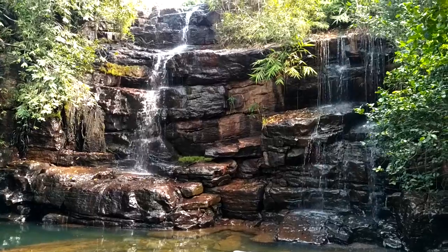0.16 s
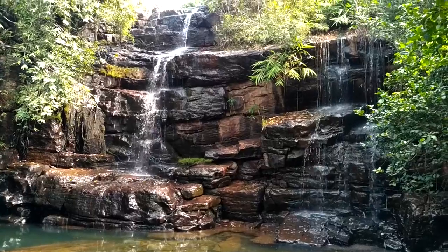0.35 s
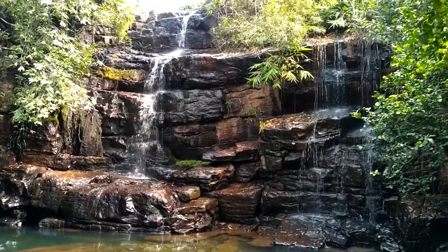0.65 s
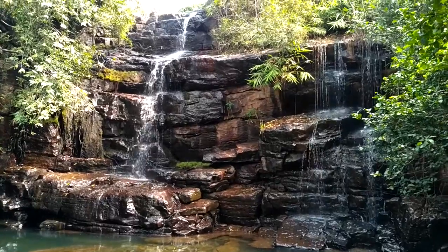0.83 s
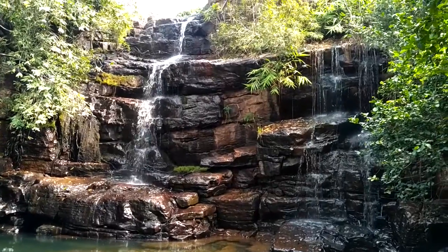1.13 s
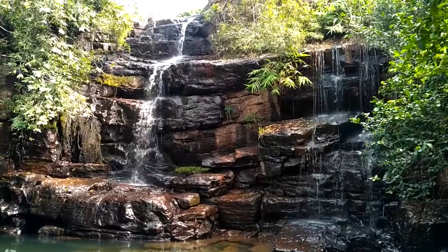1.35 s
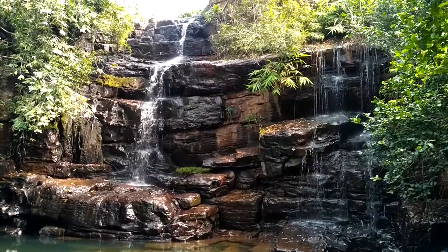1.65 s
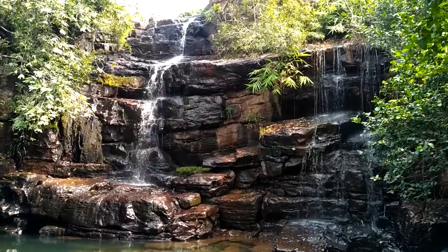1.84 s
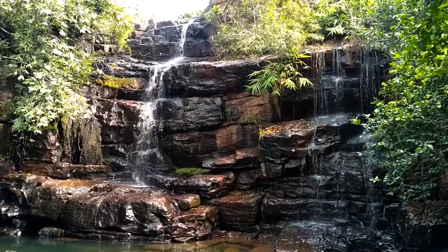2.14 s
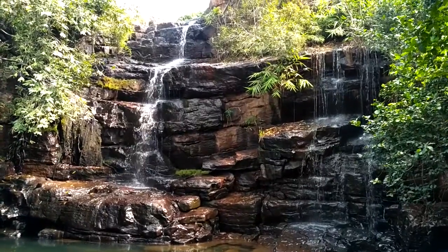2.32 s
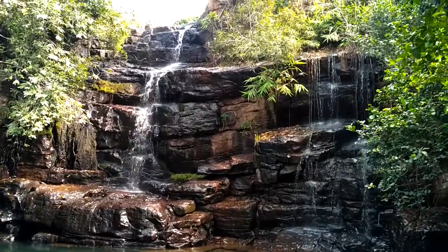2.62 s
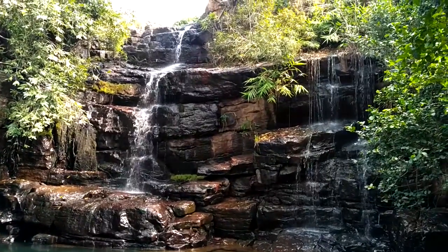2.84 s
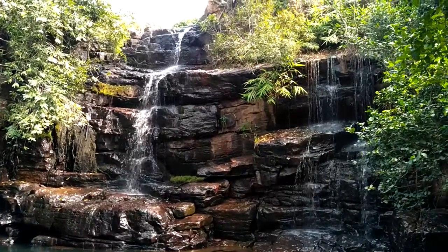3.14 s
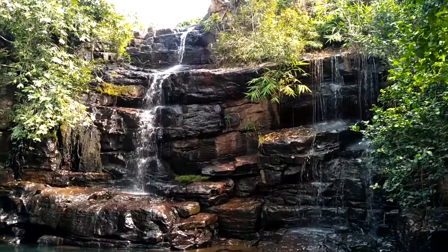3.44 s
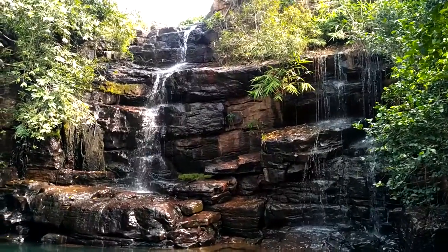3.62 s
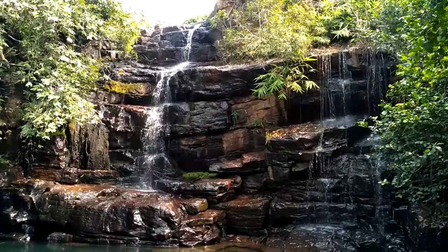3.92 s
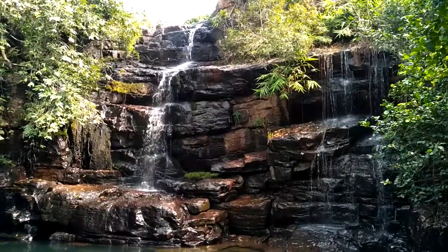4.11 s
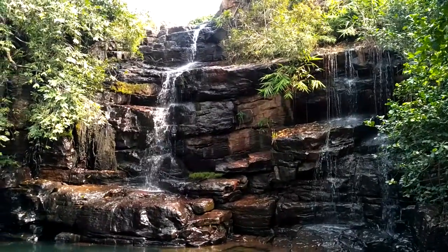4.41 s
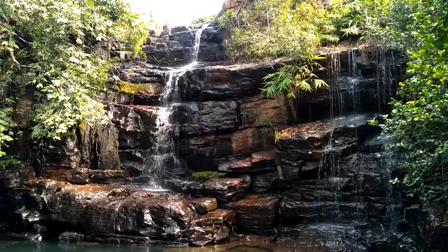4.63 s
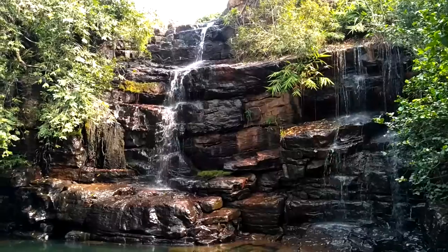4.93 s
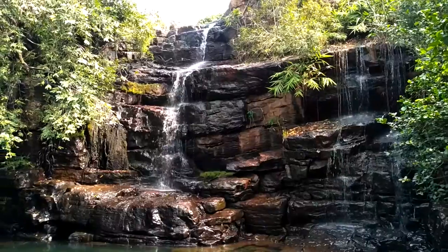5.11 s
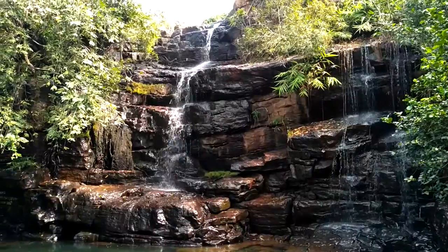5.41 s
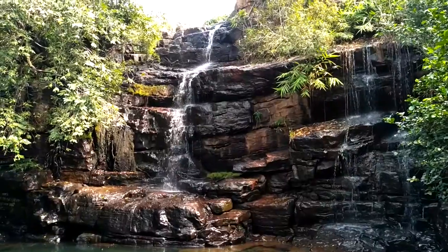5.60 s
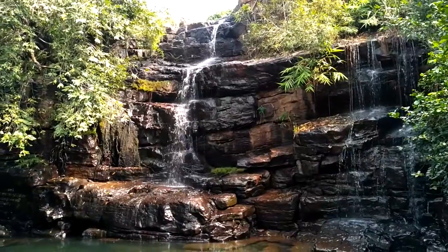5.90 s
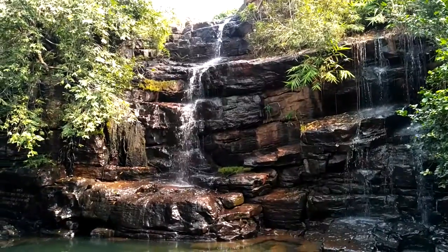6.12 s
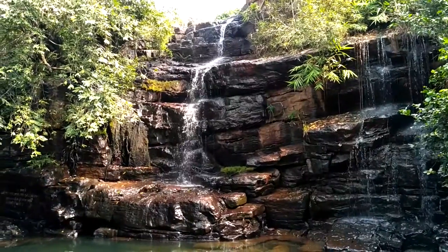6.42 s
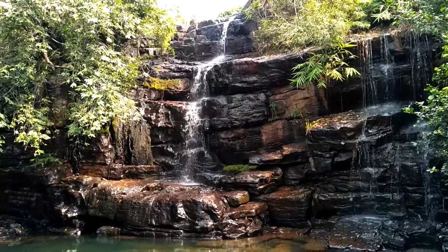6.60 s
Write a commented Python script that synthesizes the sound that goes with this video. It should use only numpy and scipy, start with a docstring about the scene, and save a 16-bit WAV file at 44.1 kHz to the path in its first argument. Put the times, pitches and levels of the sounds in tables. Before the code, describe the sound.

Heard from the bank, the same in both ears, a small waterfall hisses and patters over stone into a gurgling pool. Almost as soon as it has faded in, it drops to a much quieter level and stays there for nearly four seconds. Then it jumps back to full strength and runs on, with small splashes, bubbly plops and a few soft bumps in the pool.

```python
"""A thin waterfall splashes down rock ledges into a pool, heard from the bank, the same in both ears.
It fades in: spray hisses, drops patter on stone and the pool churns. Just after half a second the whole
sound sinks far down, while clumps of water slap the ledges, trapped air plops and the pool thuds softly.
At about 4.4 seconds it comes back at once. From there to the end, the sizzle of thin trickles turns
a little duller."""
import sys
import numpy as np
from scipy import signal
from scipy.fft import rfft, irfft, next_fast_len
from scipy.io import wavfile
from scipy.ndimage import map_coordinates

SR = 44100
rng = np.random.default_rng(int(sys.argv[2]) if len(sys.argv) > 2 else 0)


def generate_wav(sig):
    """Save sig (samples, or channels by samples) to the path in sys.argv[1] as 16-bit PCM at SR."""
    pcm = np.round(np.clip(np.atleast_2d(sig).T, -1, 1) * 32767).astype(np.int16)
    wavfile.write(sys.argv[1], SR, pcm)


N = 297675  # 6.75 seconds


def amp(db):
    """Turn decibels (dB) into a number to multiply a sound by."""
    return 10 ** (np.asarray(db) / 20)


def unit(x):
    """Scale a sound so that its average strength (rms) is 1."""
    return x / np.sqrt(np.mean(x ** 2) + 1e-20)


def ramp(start_s, length_s):
    """A straight rise from 0 to 1."""
    return np.clip((np.arange(N) / SR - start_s) / length_s, 0, 1)


def strike(t, attack, t60):
    """A quick rise, then a fade. Here and below, t60 is the seconds it takes to fade by 60 dB."""
    return (1 - np.exp(-t / attack)) * amp(-60 * t / t60)


def wobble(rate):
    """A smooth curve through random points, rate of them a second."""
    return map_coordinates(rng.standard_normal(int(N * rate / SR) + 4), [np.arange(N) * rate / SR])


def bell(x, centre, width):
    """A smooth hill, 1 high at its centre."""
    return np.exp(-2 * ((x - centre) / width) ** 2)


def filtered(x, response):
    """Turn each pitch in a sound up or down by response(Hz)."""
    size = next_fast_len(len(x) + 8192)
    return irfft(rfft(x, size) * response(np.fft.rfftfreq(size, 1 / SR)), size)[:len(x)]


def coloured(x, tone):
    """Shape a sound by rows of pitch and level, then scale it to strength 1."""
    pitches, db = np.transpose(tone)
    return unit(filtered(x, lambda hz: amp(np.interp(np.log(hz + 1), np.log(pitches), db))))


def band(x, centre_hz, width_hz):
    """Keep only the pitches near a centre, scaled to strength 1."""
    return unit(filtered(x, lambda hz: bell(hz, centre_hz, width_hz)))


def patchy(x, depth_db, span_hz, span_s, size):
    """Make a sound flicker: random patches of pitch and time get louder or softer."""
    spectrum = signal.stft(x, nperseg=size)[2]
    patches = rng.standard_normal(spectrum.shape)
    for axis, span in enumerate([span_hz * size / SR, span_s * SR * 2 / size]):
        blur = bell(np.arange(-32, 33), 0, span)
        patches = signal.fftconvolve(patches, np.expand_dims(blur, 1 - axis), mode="same")
    return signal.istft(spectrum * amp(depth_db * unit(patches)), nperseg=size)[1][:N]


def repeats(length_s, gap_s, scatter):
    """Delays in seconds of roughly even repeats that fill a length; the first is 0."""
    k = np.arange(max(np.ceil(length_s / gap_s), 1))
    jitter = rng.uniform(-1.005, 1, size=12)[:len(k)]
    return gap_s * (k + scatter * (k > 0) * jitter)


def drops(rate, spread_db):
    """Drops of mixed sizes land as tiny clicks, about rate of them a second."""
    size = amp(spread_db * np.clip(rng.standard_normal(N), -2, 2))
    lands = rng.random(N) < rate / SR
    return unit(lands * size * np.sign(rng.standard_normal(N)))


def surges(rate, t60, depth):
    """A loudness curve that jumps with each clump of water and settles again."""
    t = np.arange(SR // 4) / SR
    clumps = (rng.random(N) < rate / SR) * rng.random(N)
    power = np.abs(signal.fftconvolve(clumps ** 2, amp(-60 * t / t60) ** 2)[:N])
    return unit(np.sqrt(1 + depth * power / power.mean()))


def bubble(hz, t60, attack, glide):
    """A pocket of air rings; glide makes its pitch climb as it nears the surface."""
    t = np.arange(SR // 5) / SR
    phase = 2 * np.pi * hz * (t + glide * t * (1 - np.exp(-t / t60)))
    return np.sin(phase) * strike(t, attack, t60)


def cliff(sound, echo_db, t60):
    """A short sound plus its scattered echo off the rock face."""
    t = np.arange(len(sound)) / SR
    tail = rng.standard_normal(len(t)) * strike(t, attack=0.0035, t60=t60)
    echo = signal.fftconvolve(sound, tail / np.linalg.norm(tail))[:len(t)]
    return sound + amp(echo_db) * echo


def add(track, start_s, sound):
    """Mix a sound into a track at the given time."""
    part = track[max(round(start_s * SR), 0):][:len(sound)]
    part += sound[:len(part)]


# The tone of the churning pool. Each row: pitch in Hz, relative level in dB.
CHURN_TONE = [(20, -40), (45, -23), (100, -7), (180, -4), (240, -0.5), (310, 4), (410, 0), (540, -6.5),
              (780, -1.5), (1160, -2.5), (1400, -6.5), (2500, -62)]

def pool():
    """The stream churns the pool, over a faint deep rumble."""
    churn = patchy(rng.standard_normal(N), depth_db=3.0, span_hz=246, span_s=0.057, size=1024)
    rumble = band(rng.standard_normal(N), centre_hz=91, width_hz=67)
    return amp(-62) * coloured(churn, CHURN_TONE) + amp(-81 + 2.7 * wobble(9)) * rumble


# Soft thuds in the pool. Each row: start in seconds, relative level in dB, pitch in Hz,
# seconds over which its pushes come.
POOL_THUDS = [(2.864, -59, 179, .03), (3.04, -58, 112, .11), (3.797, -58, 130, .25),
              (5.009, -65.5, 124, .16), (5.381, -66, 75, .03), (5.44, -57.5, 129, .04),
              (6.06, -63, 79, .03), (6.381, -64, 110, .23)]

def thuds():
    """Each thud is one or more dull, low pushes, and each push stirs up a little rumble."""
    out, t = np.zeros(N), np.arange(SR // 5) / SR
    for start, db, hz, length in POOL_THUDS:
        for k, delay in enumerate(repeats(length, gap_s=0.065, scatter=0.205)):
            push = bubble(hz, t60=0.12, attack=0.0063, glide=0)
            stir = band(rng.standard_normal(len(t)), hz, hz * 0.74)
            stir *= np.sin(np.pi * t / t[-1]) * amp(-60 * t / 0.3)  # swells, then fades
            thud = amp(10.5) * push + amp(-12.5) * stir / stir.std()
            add(out, start + delay, amp(db - 2 * k) * thud)  # each 2 dB softer than the last
    return out


def gurgle(count=260):
    """Many small bubbles burst at random moments and pitches."""
    out = np.zeros(N)
    for when, pitch, size in rng.random((count, 3)):
        hz = 700 * 7 ** pitch
        ring = bubble(hz, t60=32 / hz, attack=0.00081, glide=0.047)
        db = -48 + 13 * pitch - 22 * size
        add(out, when * N / SR, amp(db) * cliff(ring, echo_db=-6.5, t60=0.22))
    return out


def small_pockets(count=20):
    """Random extra rows for the table below: faint pockets of just one bubble."""
    return [(when * N / SR, -55 + 5 * (pitch - .5) + 5 * (size - .5), 1204 * 2.5 ** (pitch - .5), 0)
            for when, pitch, size in rng.random((count, 3))]


# Pockets of trapped air breaking up in the pool. Each row: start in seconds, relative level in dB,
# first pitch in Hz, seconds over which its bubbles come.
AIR_POCKETS = [(.735, -48, 1530, .03), (.938, -51, 990, .01), (1.188, -45.5, 1305, .06),
               (1.455, -50, 1314, .01), (1.711, -50.5, 1130, .01), (2.096, -50, 1080, .01),
               (2.677, -45, 1710, .01), (2.88, -55, 910, .05), (3.181, -50, 340, .01),
               (3.388, -41.5, 1670, .03), (3.472, -53, 368, .01), (3.834, -45.5, 1703, .01),
               (4.11, -45, 1670, .01), (4.243, -28, 1670, .01), (4.712, -41.5, 1694, .05),
               (4.801, -53.5, 350, .01), (4.878, -43, 1694, .05), (4.915, -55.5, 382, .01),
               (5.391, -54, 810, .01), (5.691, -45.5, 1750, .01), (5.823, -42.5, 1790, .01),
               (5.88, -51, 1360, .03), (5.942, -53.5, 290, .01), (6.053, -43.5, 1695, .05),
               (6.188, -55.5, 312, .03), (6.269, -56.5, 437, .01), (6.679, -49.5, 300, .05)]

def plops():
    """Pockets shed big ringing bubbles in a froth of small ones, and the cliff echoes the ring."""
    out, t = np.zeros(N), np.arange(SR // 5) / SR
    for start, db, first_hz, length in AIR_POCKETS + small_pockets():
        for k, delay in enumerate(repeats(length, gap_s=0.02, scatter=0.204)):
            hz, level_db = first_hz * 1.029 ** k, db - 1.5 * k  # each is higher and softer
            ring_s = 0.025 * np.sqrt(1700 / hz)  # low bubbles ring longer
            ring = cliff(bubble(hz, t60=ring_s, attack=2 / hz, glide=0.02), echo_db=-4.5, t60=0.17)
            froth = band(rng.standard_normal(len(t)), hz * 1.085, hz * 0.35)
            froth *= strike(t, attack=0.0036, t60=0.15)
            add(out, start + delay, amp(level_db) * (amp(11) * ring + amp(-5.5) * froth))
    return out


def trickles():
    """Thin threads of water sizzle; the sizzle grows lower and narrower towards the end."""
    bright = band(drops(rate=12000, spread_db=1.5), centre_hz=11940, width_hz=3300)
    dull = band(drops(rate=13000, spread_db=3.0), centre_hz=10960, width_hz=1640)
    dull_share = ramp(start_s=4.8, length_s=2.3)
    sizzle = np.sqrt(1 - dull_share) * bright + np.sqrt(dull_share) * dull
    return amp(-42 + 0.24 * wobble(14)) * sizzle


# Hollows under the ledges boost some pitches. Each row: pitch in Hz, width in Hz, boost in dB.
ROCK_HOLLOWS = [(1663, 204, 5.5), (2460, 350, 3), (3493, 400, 5), (3890, 150, 2), (4560, 240, 6)]
# The tone of drops on stone. Each row: pitch in Hz, relative level in dB.
PATTER_TONE = [(700, -29.5), (1200, -20.5), (1450, -9), (2000, -7.5), (2500, -4.5), (3000, -4), (4200, -1),
               (5000, -2.5), (7000, -9.5), (12000, -64)]

def patter():
    """Larger drops strike the ledges in uneven bursts, and hollows in the rock ring along."""
    hits = rng.standard_normal(N) + amp(-4) * drops(rate=1500, spread_db=3)
    hits = patchy(hits, depth_db=1.25, span_hz=600, span_s=0.028, size=512)
    hits *= surges(rate=120, t60=0.066, depth=0.34)
    hits = filtered(hits, lambda f: amp(sum(db * bell(f, hz, width) for hz, width, db in ROCK_HOLLOWS)))
    return amp(-45.5) * coloured(hits, PATTER_TONE)


def small_clumps(count=18):
    """Random extra rows for the table below: lesser clumps, the higher ones louder."""
    return [(when * N / SR, -40.5 + 7 * (pitch - .5) + 4 * (size - .5), 4920 * 4 ** (pitch - .5), 0.06)
            for when, pitch, size in rng.random((count, 3))]


# The biggest clumps of water hitting rock. Each row: start in seconds, relative level in dB,
# middle pitch in Hz, seconds to fade by 60 dB.
WATER_CLUMPS = [(1.2, -36, 5260, .09), (1.209, -38, 2700, 0.12), (1.6, -38.5, 2730, 0.091),
                (2.146, -34, 5260, 0.081), (2.945, -41.5, 3160, .1), (3.847, -37.5, 2870, 0.067),
                (3.917, -35, 4700, 0.056), (4.412, -41, 2450, 0.07), (4.613, -30, 6700, 0.052),
                (4.802, -32, 7460, 0.042), (5.019, -24.5, 10700, 0.03), (5.296, -31.5, 8400, .07),
                (5.468, -35, 3750, .09), (5.882, -36.5, 2960, 0.11), (6.292, -34.5, 3630, 0.15)]

def splashes(bubbles_each=7):
    """Each clump bursts into a brief shower of drops and a few tiny ringing bubbles."""
    out, t = np.zeros(N), np.arange(SR // 5) / SR
    for start, db, hz, t60 in WATER_CLUMPS + small_clumps():
        width_hz = 0.35 * hz
        shower = band(rng.standard_normal(len(t)), hz, width_hz) * strike(t, attack=0.0011, t60=t60)
        for when, pitch in rng.random((bubbles_each, 2)):
            ring = bubble(hz + (pitch - .5) * width_hz * .8, t60=50 / hz, attack=0.00037, glide=0.027)
            add(shower, when ** 2 * t60 / 2, amp(-4.5 - 23 * when) * ring)  # later ones are softer
        add(out, start, amp(db) * cliff(shower, echo_db=-6, t60=0.36))
    return out


# The tone of the fine spray. Each row: pitch in Hz, relative level in dB.
SPRAY_TONE = [(2800, -42), (4400, -10.5), (5200, -4), (6000, -2), (7000, -2), (8000, -0.5), (10000, -.5),
              (13000, -1.5), (14500, -1), (15700, -4)]

def spray():
    """Countless fine droplets blend into a hiss."""
    mist = rng.standard_normal(N) + amp(-4.5) * drops(rate=3000, spread_db=2.5)
    mist = patchy(mist, depth_db=0.75, span_hz=2000, span_s=0.024, size=256)
    mist *= surges(rate=110, t60=0.051, depth=0.16)
    return amp(-36.5) * coloured(mist, SPRAY_TONE)


def scene():
    """All the water together, the same on the left and right."""
    water = spray() + trickles() + patter() + pool() + splashes() + plops() + gurgle() + thuds()
    return np.array([water, water])


def volume(fall_s):
    """The overall loudness: fade in, hold, sink over fall_s seconds, stay low, jump back."""
    opening_db, dip_db, ending_db = -2.2, -19.5, 0.5
    fade_in = 0.1 + 0.9 * ramp(start_s=0, length_s=0.27)
    sink_db = (dip_db - opening_db) * ramp(start_s=0.543, length_s=fall_s)
    return_db = (ending_db - dip_db) * ramp(start_s=4.388, length_s=0.0064)
    return fade_in * amp(opening_db + sink_db + return_db)


def record(dry):
    """The sound fades in, dips (low pitches faster than the hiss) and returns; the very top is cut off."""
    split_hz, top_hz = 5100, 15750
    out = []
    for side in dry:
        lows = filtered(side, lambda hz: hz < split_hz)
        hiss = side - lows
        faded = lows * volume(fall_s=0.042) + hiss * volume(fall_s=0.1)
        out.append(filtered(faded, lambda hz: hz < top_hz))
    return np.array(out)


dry = scene()
out = record(dry)
generate_wav(out)
```